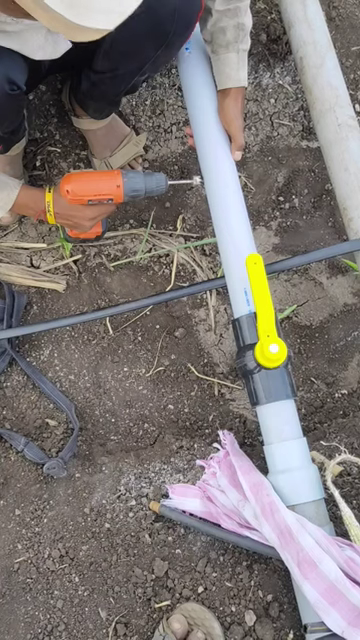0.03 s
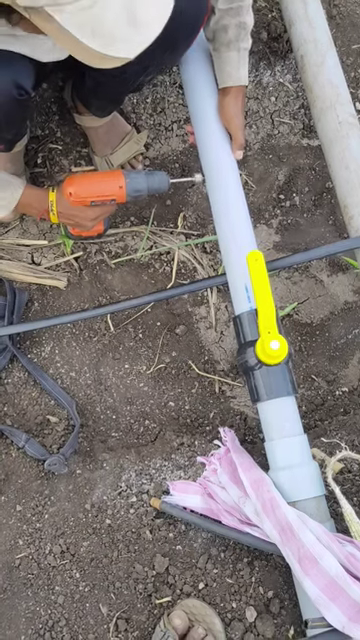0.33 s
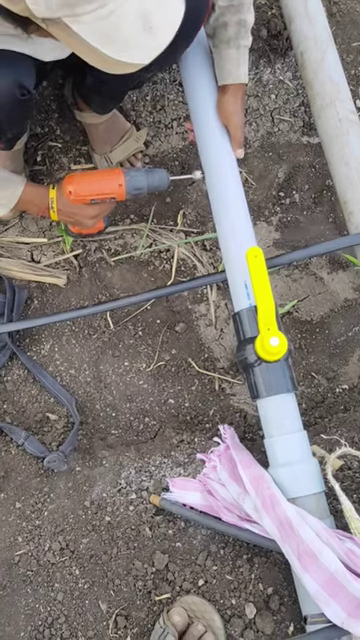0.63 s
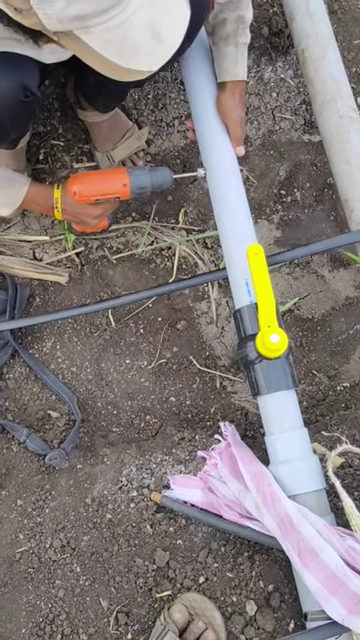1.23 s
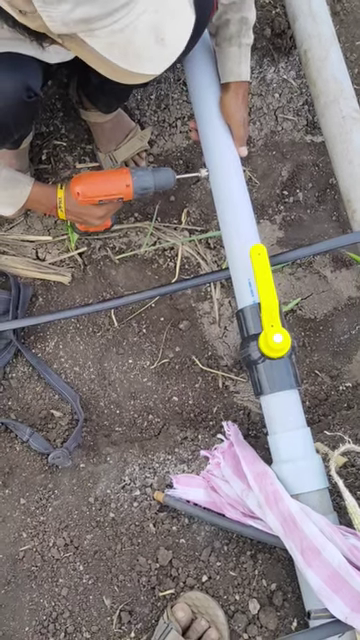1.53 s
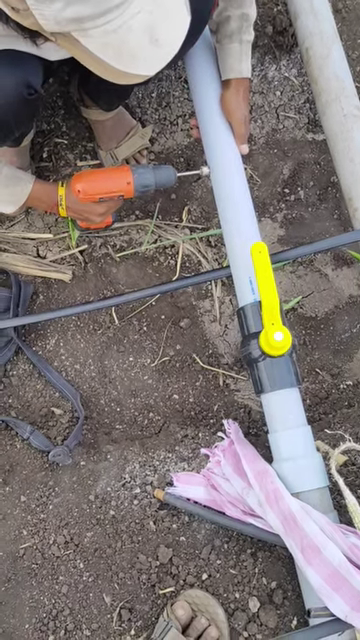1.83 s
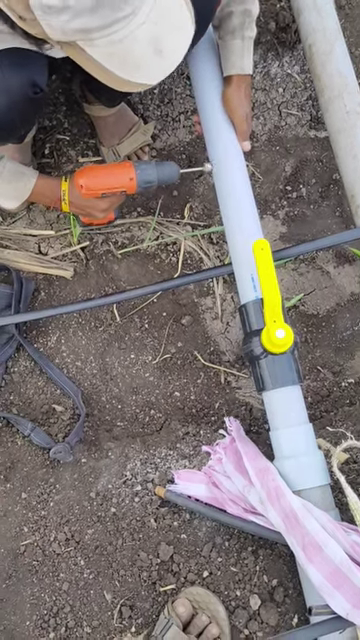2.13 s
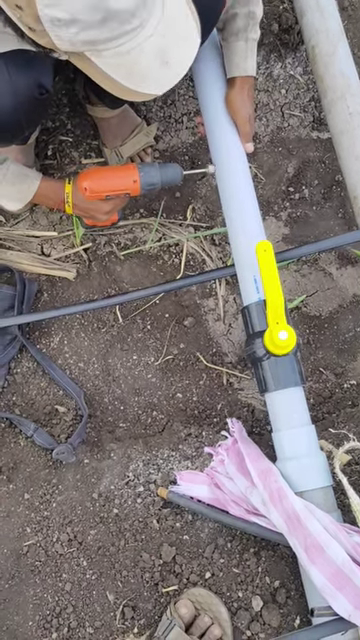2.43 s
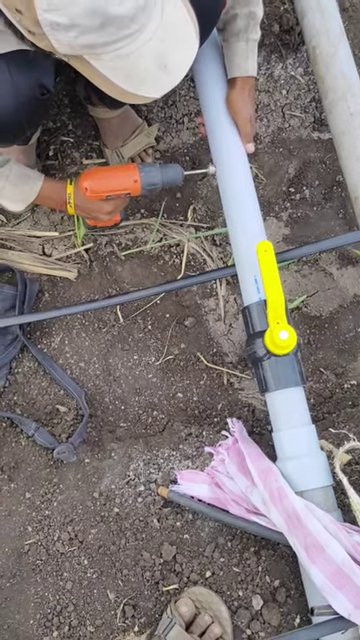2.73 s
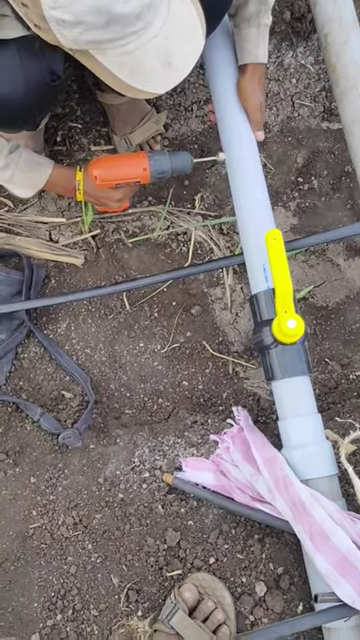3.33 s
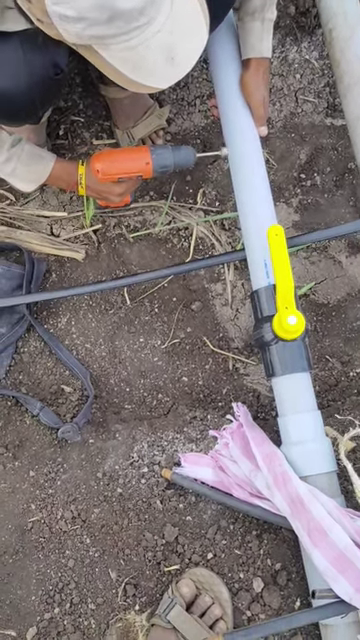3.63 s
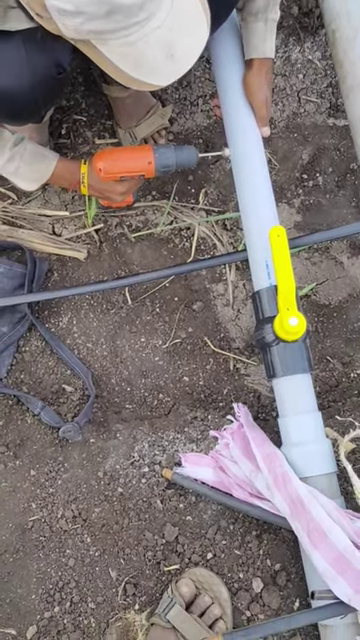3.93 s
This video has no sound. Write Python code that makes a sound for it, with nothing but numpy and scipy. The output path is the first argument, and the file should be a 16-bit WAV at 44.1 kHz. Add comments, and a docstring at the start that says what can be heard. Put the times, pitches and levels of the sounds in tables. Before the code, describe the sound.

Outdoors, a hand-held electric drill whirs up to speed and holds a high whine. It then digs into a plastic pipe, slowing a little with a rough burst of crunching that settles into scraping and gear rattle.

```python
"""Outdoors, a hand-held electric drill spins up, runs light against a plastic pipe, then bites and slows.
Motor and gears whine at multiples of the shaft speed, loose teeth excite the gear case's resonances,
and brushes and fan add broadband hiss. The bit catches about once a chuck turn and rings the pipe,
then settles into scraping. The starting current hums briefly underneath."""
import sys
import numpy as np
from scipy import signal
from scipy.fft import rfft, irfft
from scipy.io import wavfile
from scipy.ndimage import uniform_filter1d

SR = 44100
rng = np.random.default_rng(int(sys.argv[2]) if len(sys.argv) > 2 else 0)


def digitize_waveform(pressure):
    """Quantize a signal to 16-bit integers and store it at the path in sys.argv[1].

    Rows of a 2-D input are taken as channels; values are limited to [-1, 1].
    """
    field = np.atleast_2d(pressure).T
    bounded = np.clip(field, -1, 1)
    quanta = np.round(bounded * 32767).astype(np.int16)
    wavfile.write(sys.argv[1], SR, quanta)


N = 176400
START_S, RISE_S, CONTACT_S = 0.23, 0.053, 2.1
GEAR_RATIO, TEETH, SEGMENTS = 18.3, 5, 24  # shaft turns per chuck turn, pinion teeth, commutator bars

# Motor and gear partials. Each row: multiple of the shaft speed (rounded to halves in use),
# then levels in dB when spinning up, running free and under load.
PARTIALS = [(1, -89, -69, -60), (2, -59, -50.5, -59.5), (2.5, -83, -77, -57.5), (4, -78, -60, -67.5),
            (5, -75, -58, -67.5), (6, -56, -48.5, -45), (7.5, -62, -57.5, -50.5), (9, -71, -57, -57.5),
            (10, -70, -51, -40), (12, -68.5, -60, -60), (14, -69, -59.5, -49.5), (15, -54.5, -64, -40.5),
            (18, -60, -58.5, -59.5), (20, -71, -66, -51), (22.5, -74, -69.5, -49.5),
            (24, -58, -57.5, -56.5), (30, -71.5, -71, -55), (31, -72.5, -72, -53), (41.8, -69, -53, -65),
            (43.8, -68, -68, -52), (46.2, -72, -64, -57.5), (48.4, -63, -75, -56),
            (54.1, -55.5, -74, -76.5)]
def whine(t, turns, speed, spin, load):
    """Periodic forcing: partials lock to the shaft, and load shifts strength from motor to gear mesh."""
    out, knock_gain = 0, amp(knock_db(t))
    flare_hz, flare_width_hz = CASE_MODES[1][0], 89
    for order, spin_db, free_db, loaded_db in PARTIALS:
        order = round(2 * order) / 2
        hum = order < 3
        detuning = 2 * (order * speed - flare_hz) / flare_width_hz
        flare = 1 + 1.8 * spin * knock_gain / (1 + detuning ** 2) ** 2  # swells at a case resonance
        fade = np.minimum(speed / 135, 1) ** (13 if hum else 1.7)  # the low hum needs speed
        flutter_db = (1.06 if hum else 2.12 + spin) * walk(55)
        db = free_db + (spin_db - free_db) * spin + (loaded_db - free_db) * load + flutter_db
        phase = 2 * np.pi * (order * turns + rng.random())
        mesh_play = .33 * min(order / SEGMENTS, 1) * walk(70)
        out += flare * fade * amp(db) * np.sqrt(2) * np.sin(phase + mesh_play)
    return out

# Gear case modes. Each row: frequency in Hz, bandwidth in Hz, gain in dB.
CASE_MODES = [(889, 130, -12.5), (952, 69, -7.5), (1397, 120, 0), (1481, 145, -2), (1584, 30, -1.5)]
# Rattle envelope. Each row: time in seconds, relative level in dB.
RATTLE_LEVEL = [(.27, -41), (.4, -40.5), (.72, -39.5), (1.0, -37), (1.2, -35.5), (1.8, -37.5),
                (2.15, -35.5), (2.3, -37), (2.42, -33), (3.3, -33.5), (4.0, -34)]
def gear_rattle(t, turns, load):
    """Impact excitation: uneven tooth strikes ring the case, the hard ones mostly in its main mode."""
    strikes = np.diff(np.floor(TEETH * turns), prepend=0) * rng.standard_normal(N)
    force = unit(strikes) + 0.59 * rng.standard_normal(N)
    throb_db = 1.5 * load * np.cos(6 * np.pi * turns / GEAR_RATIO + .6 * walk(8))  # three per chuck turn
    knock_gain = amp(knock_db(t))
    rattle = body(force * amp(throb_db), CASE_MODES) * knock_gain ** 0.26
    main_mode = np.sqrt(2) * np.sin(2 * np.pi * CASE_MODES[2][0] * t + walk(40))
    clang = amp(-2.5) * (knock_gain - 1) * main_mode
    return (rattle + clang) * amp(curve(t, RATTLE_LEVEL) - 4.5)

# Hard tooth knocks. Each row: time in seconds, strength in dB.
TOOTH_KNOCKS = [(.268, 7), (.281, 3.5), (.294, 9.5), (.356, 8), (.375, 10), (.387, 7.5), (.493, 8.5),
                (.546, 8.5), (.594, 8), (0.641, 9), (.688, 10), (1.828, 3), (2.13, 9), (2.233, 11),
                (2.338, 8), (2.442, 12), (2.482, 0), (2.602, 3), (2.642, 3), (2.73, 8), (2.797, 8.5),
                (2.905, 11), (2.98, 7), (3.19, 3), (3.4, 3), (3.442, 9.5), (3.527, 10.5), (3.622, 6),
                (3.692, 13), (3.703, 1), (3.74, 7), (3.85, 2.5), (3.956, 14)]
def knock_db(t, half_width_s=0.0076):
    """Transient excitation: each hard knock is a Gaussian pulse of extra level."""
    return sum(db * np.exp(-((t - at) / half_width_s) ** 2) for at, db in TOOTH_KNOCKS)

# Pipe modes. Each row: frequency in Hz, bandwidth in Hz, gain in dB.
PIPE_MODES = [(1464, 170, 6), (1860, 250, -1), (2490, 350, 6), (2846, 440, 1), (3670, 280, -8),
              (4550, 800, -2.5), (5560, 480, -1)]
# Scraping envelope. Each row: time in seconds, level in dB.
SCRAPE_LEVEL = [(2.1, -74), (2.23, -47), (2.35, -36.5), (2.6, -38), (3.0, -39), (3.3, -44.5), (4.0, -52.5)]
# Catches of the cutting edge. Each row: time in seconds, half-width in seconds, crunch level in dB,
# boom level in dB, boom frequency in Hz.
CATCHES = [(2.209, 0.0067, -29.5, -46, 2695), (2.277, .004, -27, -46, 2570),
           (2.288, 0.0086, -34, -45, 2570), (2.314, 0.0036, -21, -27.5, 2750),
           (2.318, 0.012, -30.5, -23, 1022), (2.333, 0.0037, -30, -28, 2700),
           (2.365, 0.0046, -38, -26, 2585), (2.387, .006, -25.5, -33, 1050),
           (2.395, 0.0037, -30, -26, 2370), (2.432, .009, -26.5, -42, 2750),
           (2.435, 0.0065, -26, -21.5, 990), (2.45, 0.0098, -28, -22.5, 976),
           (2.516, .014, -32, -33.5, 2550), (2.55, 0.0058, -28.5, -29, 1000), (2.56, .011, -34, -24.5, 982),
           (2.575, 0.011, -25.5, -23, 920), (2.639, .005, -33, -38, 2600), (2.68, 0.012, -39, -27.5, 970),
           (2.698, 0.014, -33, -28.5, 991), (2.747, 0.011, -32.5, -38, 2600),
           (2.807, 0.0018, -29, -27, 970), (2.828, .008, -33, -27.5, 970), (2.872, 0.005, -29, -32, 1000),
           (2.884, 0.0052, -38, -30, 1000), (2.937, 0.013, -37, -40.5, 635),
           (2.996, .005, -35, -30.5, 2650), (3.071, 0.0063, -50, -40, 576),
           (3.117, 0.017, -32.5, -33, 1050)]
def cutting(t, turns, chips):
    """Stick-slip friction: chips ring the pipe, and each catch adds a crunch and a juddering boom."""
    scrape_db = curve(t, SCRAPE_LEVEL) + 2 * np.cos(4 * np.pi * turns / GEAR_RATIO) + 2 * walk(80)
    power = amp(scrape_db) ** 2
    slip = walk(200) + .3 * walk(600)
    grip = unit(1 + .3 * walk(600))
    boom, lag_s = 0, .0036
    for at, half_width, crunch_db, boom_db, hz in CATCHES:
        power += (amp(crunch_db) * np.exp(-2 * ((t - at) / half_width) ** 2)) ** 2
        push = amp(boom_db) * np.sqrt(2) * grip * np.exp(-2 * ((t - at - lag_s) / half_width) ** 2)
        judder = 2 * np.pi * hz * t + slip
        octave = amp(-11.5) * push * np.sin(2 * judder)
        boom += ring(push * np.sin(judder) + 1e-18, hz, width=300) + octave
    return body(chips, PIPE_MODES) * np.sqrt(power) + boom

def chip_impulses(per_s=3800):
    """Fracture as a Poisson process: tiny chips break off as impulses of random sign and size."""
    breaks = rng.random(N) < per_s / SR
    return breaks * rng.choice([-1, 1], N) * amp(1.5 * rng.standard_normal(N))

# Hiss envelope. Each row: time in seconds, treble level in dB.
HISS_LEVEL = [(.27, -52), (.45, -48.5), (.6, -47), (.85, -43), (1.24, -38.5), (1.55, -40), (1.9, -41.5),
              (2.25, -38.5), (2.6, -39.5), (3.1, -39), (4.0, -38.5)]
# Hiss spectra spinning up, running free and under load. Each row: frequency in Hz, relative level in dB.
SPIN_SPECTRUM = [(20, -39.5), (55, -14), (90, -19), (200, -14.5), (380, -15.5), (500, -2), (700, -2),
                 (950, 10.5), (1150, -12), (1900, -1), (2450, -7), (2950, 3), (3700, -4), (4600, -7),
                 (5300, 1), (6600, -2.5), (7600, -6.5)]
FREE_SPECTRUM = [(20, -25), (50, -18.5), (80, -21), (170, -16.5), (280, -10.5), (450, -6.5), (650, -6),
                 (850, 1.5), (1200, -4), (1800, -5), (2200, -2.5), (2450, -3.5), (2850, 1), (3400, -3.5),
                 (4600, -3.5), (5300, -1), (6600, -1.5), (7500, -7)]
LOADED_SPECTRUM = [(20, -35), (50, -19.5), (80, -24.5), (170, -11), (250, -13), (400, -5), (650, -4.5),
                   (850, 1.5), (1100, -2.5), (1800, 3.5), (2300, 1), (2850, 5), (3300, 2.5), (3650, 0.5),
                   (4900, -3.5), (5500, 1.5), (6800, 3), (7500, -1.5)]
def brush_and_fan_hiss(t, turns, spin, load):
    """Amplitude modulation: spark and air noise pulses with each commutator bar and each shaft turn."""
    pulsing = 1 + 0.48 * np.cos(2 * np.pi * SEGMENTS * turns) + 0.13 * np.cos(2 * np.pi * turns)
    sparks = pulsing * amp(walk(250) + .5 * walk(50))
    states = [(spin, SPIN_SPECTRUM, 0), (1 - spin - load, FREE_SPECTRUM, -1.5), (load, LOADED_SPECTRUM, 0)]
    hiss = 0
    for share, spectrum, db in states:
        hiss += np.sqrt(np.abs(share)) * amp(db) * colour(sparks * rng.standard_normal(N), spectrum)
    return hiss * amp(curve(t, HISS_LEVEL))

# Pipe wall modes. Each row: frequency in Hz, bandwidth in Hz, gain in dB.
WALL_MODES = [(971, 114, 2), (1180, 160, -9.5)]
# Groan envelope. Each row: time in seconds, level in dB.
GROAN_LEVEL = [(2.25, -57), (2.4, -42), (2.95, -41.5), (3.53, -41.5), (3.58, -48)]
def wall_groan(t, chips):
    """Forced vibration: chips drive the wall under the bit, more weakly once the hole opens."""
    return body(chips, WALL_MODES) * amp(curve(t, GROAN_LEVEL) + 2 * walk(40))

def starting_hum(t, hz=100, t60_s=0.58):
    """Inrush current: its mains hum decays exponentially as the motor gathers speed."""
    age = np.maximum(t - START_S, 0)
    return amp(-46) * np.exp(-np.log(1000) * age / t60_s) * np.sin(2 * np.pi * hz * age)

def amp(db):
    """Decibels to amplitude ratio."""
    return 10 ** (np.asarray(db) / 20)

def unit(x):
    """Normalisation to rms 1."""
    return x / np.sqrt(np.mean(x ** 2) + 1e-20)

def curve(t, rows):
    """Linear interpolation through (time, value) rows."""
    return np.interp(t, *np.array(rows, float).T)

def walk(rate):
    """Smoothed noise of rms 1, with `rate` new values a second."""
    k = max(2, int(SR / rate))
    steps = np.repeat(rng.standard_normal(N // k + 1), k)
    return unit(uniform_filter1d(uniform_filter1d(steps, k), k)[:N])

def ring(x, hz, width):
    """A damped resonator with gain 1 at its centre."""
    return signal.lfilter(*signal.iirpeak(hz, hz / width, fs=SR), x)

def body(x, modes):
    """Modal superposition: a body radiates little below its lowest mode."""
    y = sum((-1) ** k * amp(db) * ring(x, hz, width) for k, (hz, width, db) in enumerate(modes))
    return unit(signal.sosfilt(signal.butter(4, 0.81 * modes[0][0], "high", fs=SR, output="sos"), y))

def colour(x, points):
    """Spectral shaping, normalised to rms 1 in the treble."""
    f = np.arange(N // 2 + 1) * SR / N + 1e-3
    hz, db = np.array(points).T
    spectrum = rfft(x) * amp(np.interp(np.log(f), np.log(hz), db))
    treble = irfft(spectrum * ((f > 4800) & (f < 7500)), N)
    return irfft(spectrum, N) / treble.std()

# Motor shaft speed. Each row: time in seconds, turns per second.
SHAFT_SPEED = [(.23, 70), (.3, 82.5), (.4, 101), (.5, 115), (.6, 124.3), (.73, 133), (.8, 152), (.87, 159),
               (.95, 161.4), (1.06, 161.7), (1.22, 159.3), (1.35, 159), (1.6, 160.6), (1.85, 161.2),
               (2.08, 160.4), (2.21, 158.6), (2.36, 150), (2.6, 145.8), (2.75, 145.7), (2.95, 143.8),
               (3.05, 144.2), (3.3, 143.6), (3.8, 139.9), (4.0, 140.6)]
def scene(free_hz=160, loaded_hz=141.5):
    """Superposition: one shaft drives drill and bit, below its free speed in spin-up and under load."""
    t = np.arange(N) / SR
    speed, pressed = curve(t, SHAFT_SPEED), t > CONTACT_S
    spin = np.clip((free_hz - speed) / 14, 0, 1) * (1 - pressed)
    load = np.clip((free_hz - speed) / (free_hz - loaded_hz), 0, 1) * pressed
    drag = .003 * load * np.sin(2 * np.pi * np.cumsum(speed) / SR / GEAR_RATIO)  # once a chuck turn
    turns = np.cumsum(speed * (1 + drag + .0013 * walk(25))) / SR
    running = np.clip((t - START_S) / RISE_S, 0, 1)
    drill = whine(t, turns, speed, spin, load) + gear_rattle(t, turns, load)
    drill += brush_and_fan_hiss(t, turns, spin, load)
    chips = chip_impulses()
    pipe = cutting(t, turns, chips) + wall_groan(t, chips)
    sound = running ** 1.34 * drill + pressed * pipe + running * starting_hum(t)
    return np.array([sound, sound])

def record(dry, roll_off_hz=7560, top_hz=8300):
    """Band limiting: a mono microphone passes little of the high treble."""
    soft = signal.sosfilt(signal.cheby1(10, .5, roll_off_hz, fs=SR, output="sos"), dry)
    return signal.sosfilt(signal.ellip(10, .2, 80, top_hz, fs=SR, output="sos"), soft)

dry = scene()
out = record(dry)
digitize_waveform(out)
```